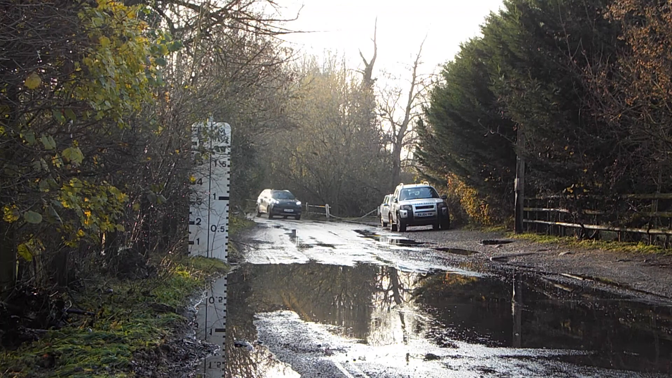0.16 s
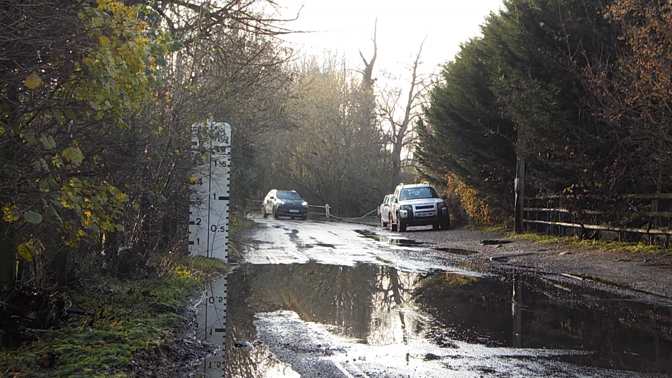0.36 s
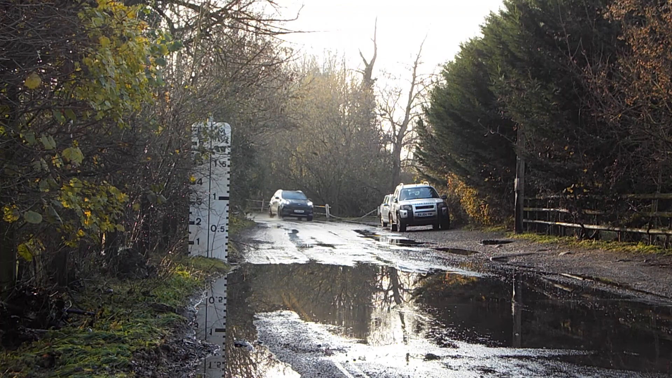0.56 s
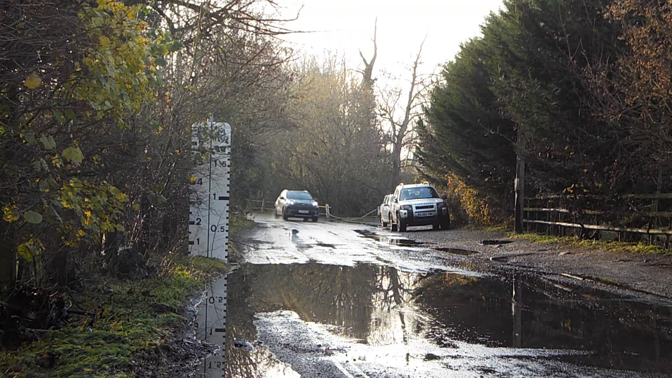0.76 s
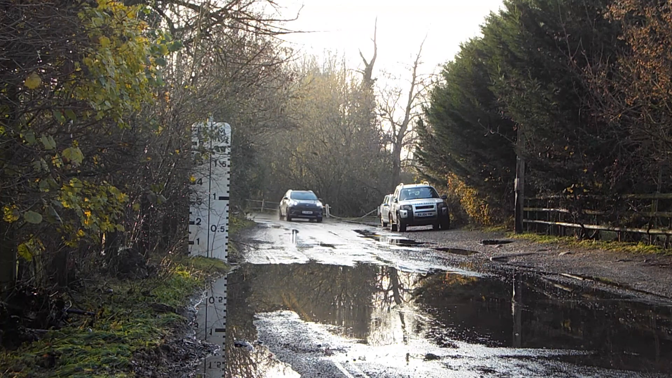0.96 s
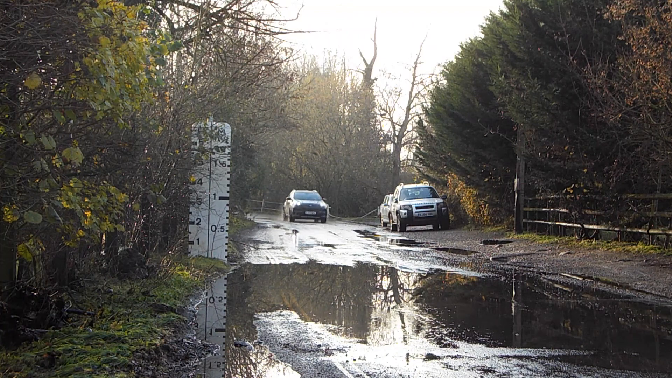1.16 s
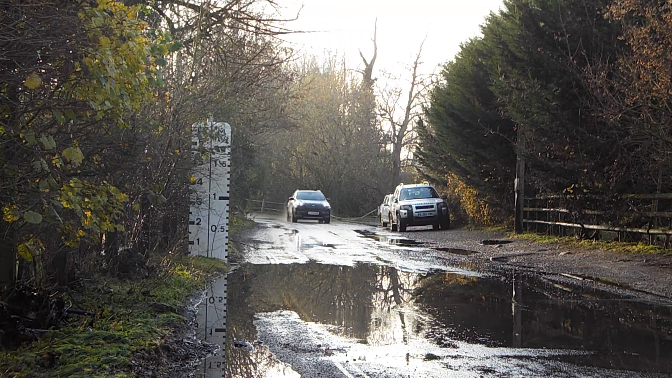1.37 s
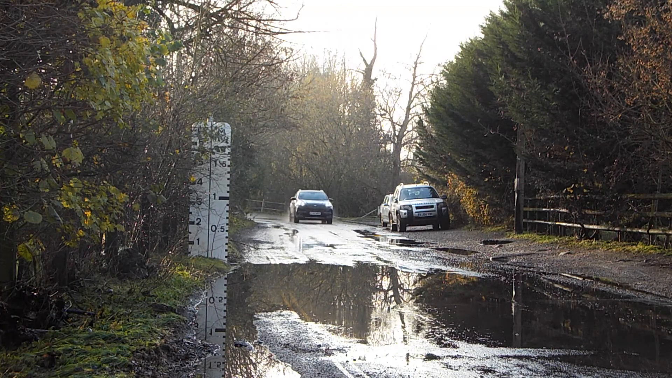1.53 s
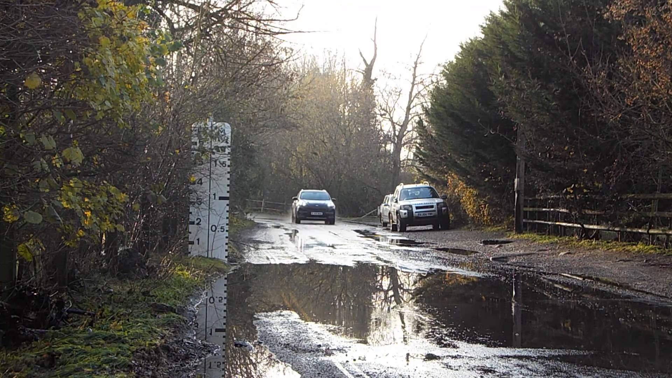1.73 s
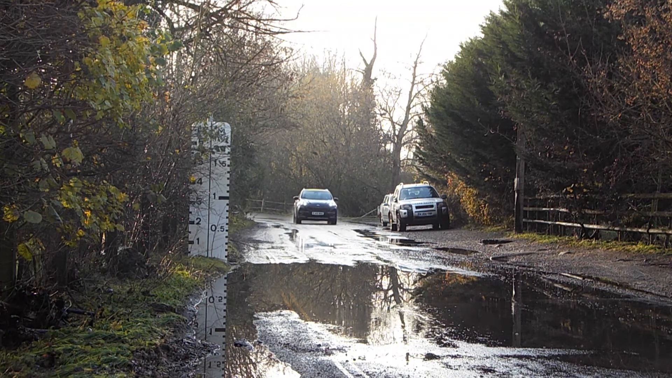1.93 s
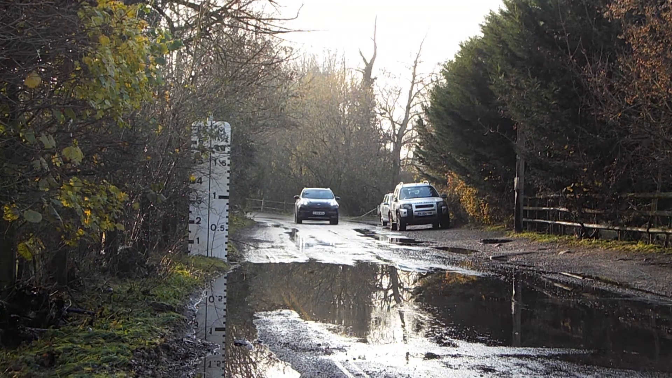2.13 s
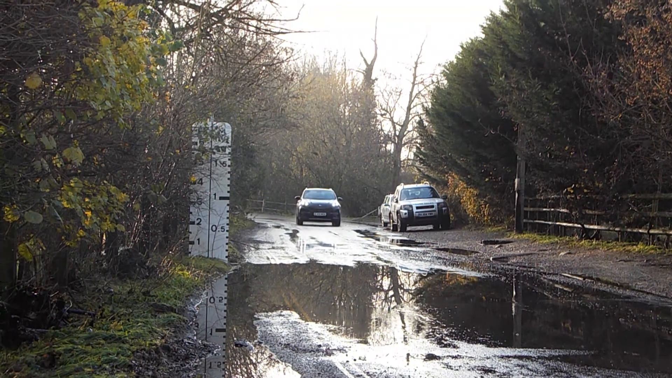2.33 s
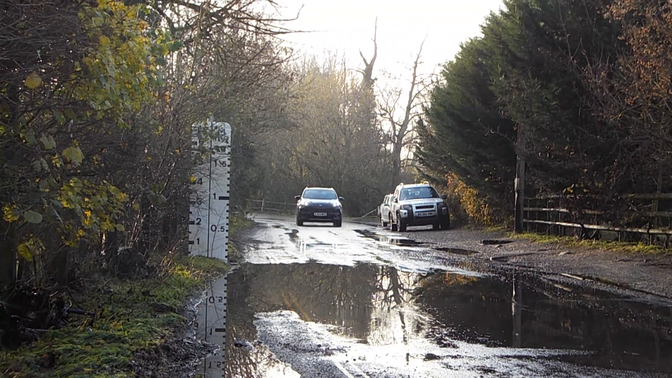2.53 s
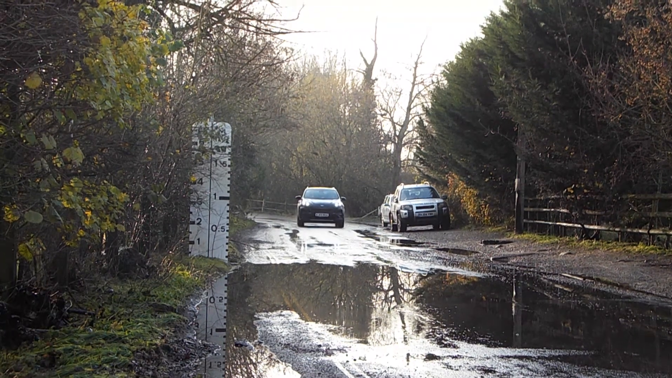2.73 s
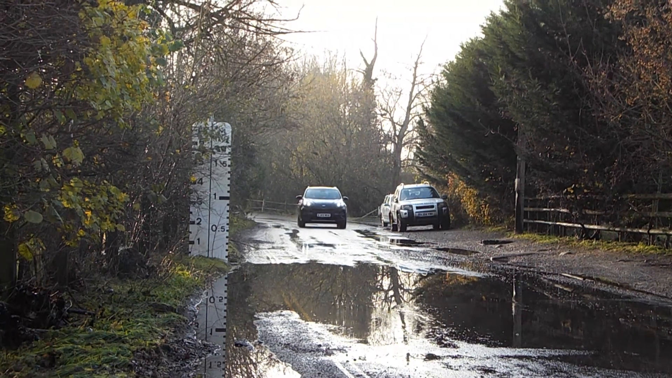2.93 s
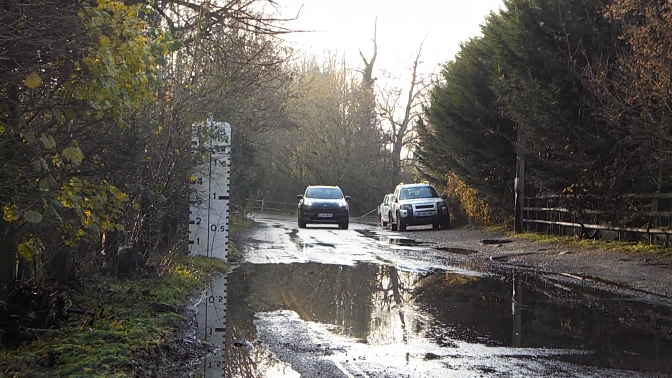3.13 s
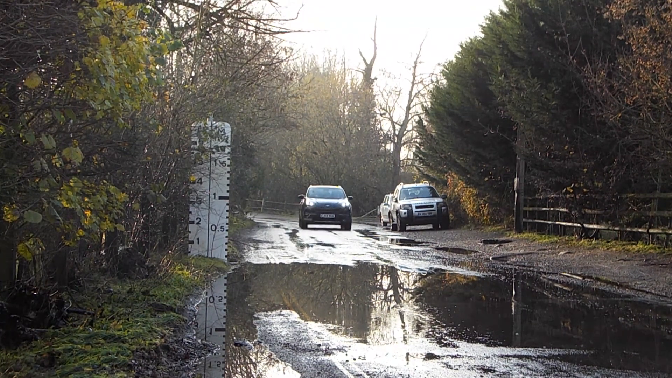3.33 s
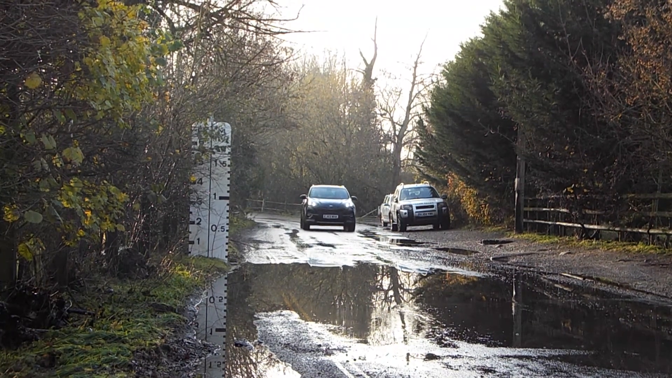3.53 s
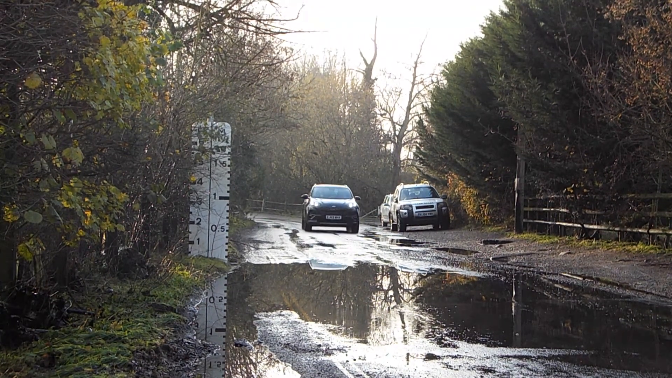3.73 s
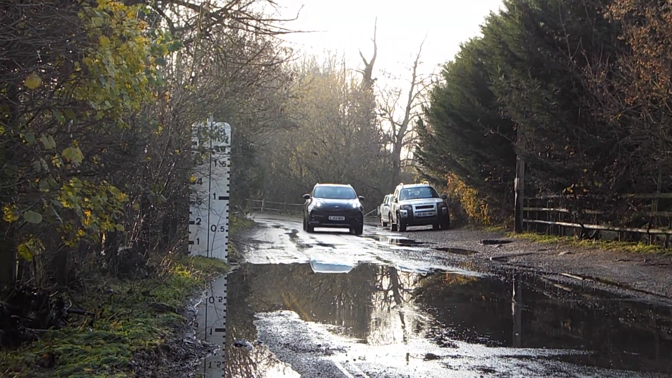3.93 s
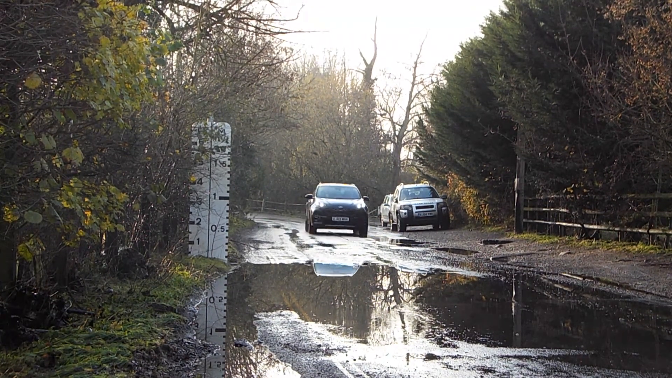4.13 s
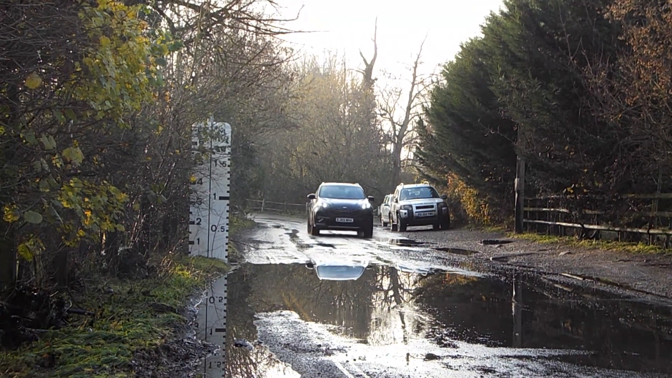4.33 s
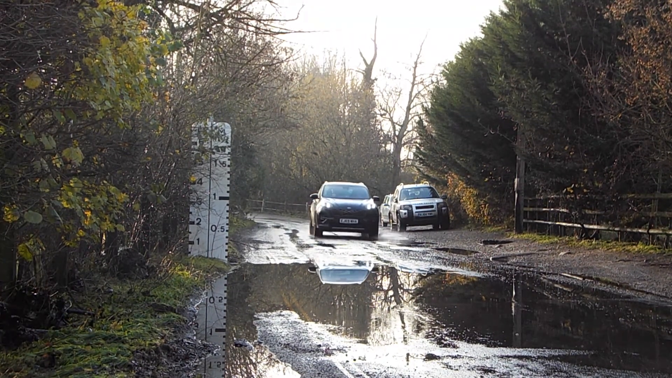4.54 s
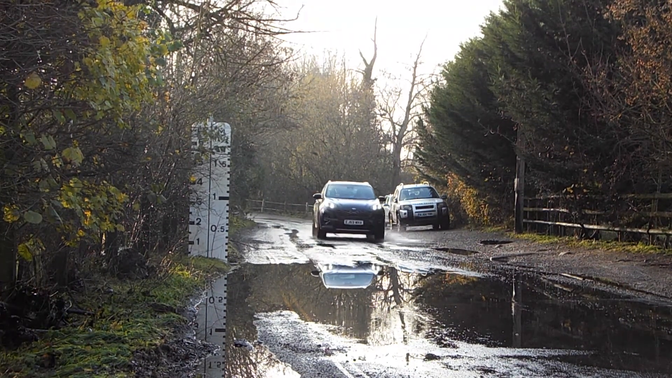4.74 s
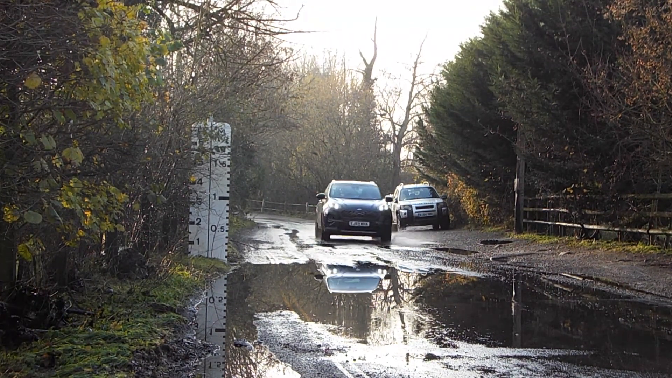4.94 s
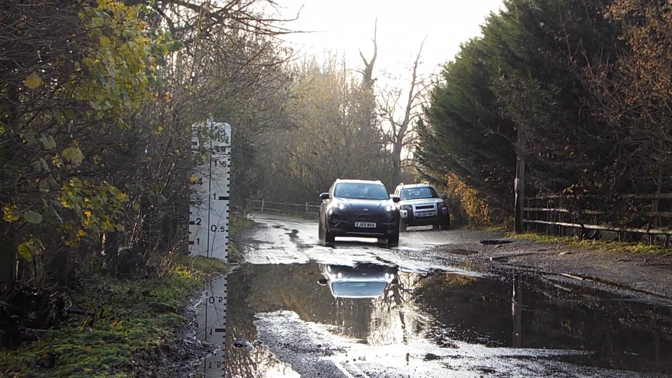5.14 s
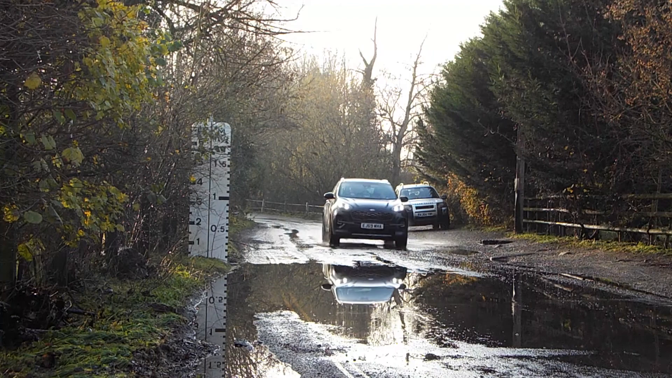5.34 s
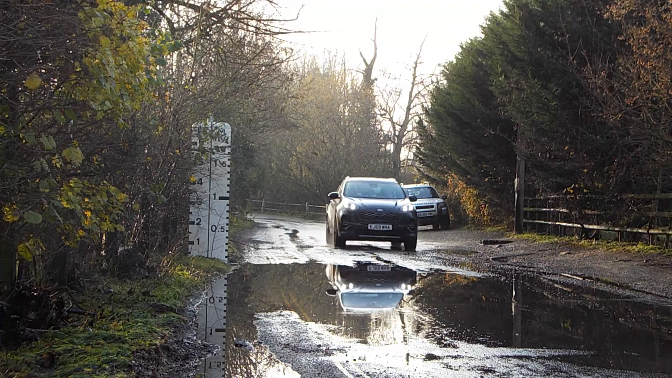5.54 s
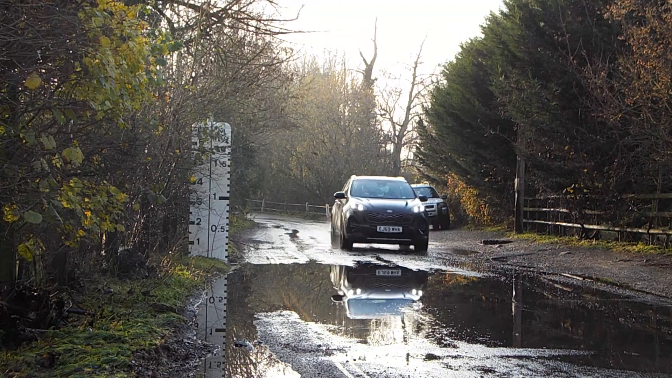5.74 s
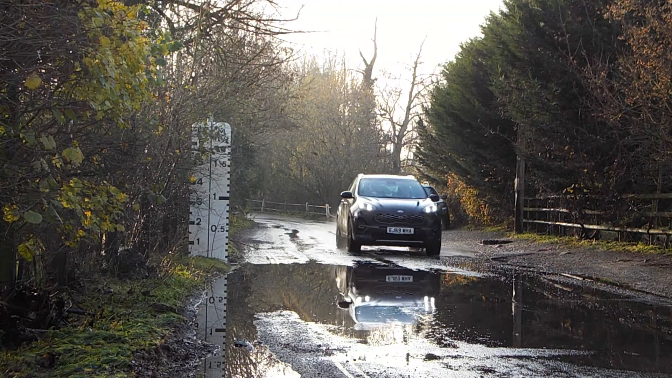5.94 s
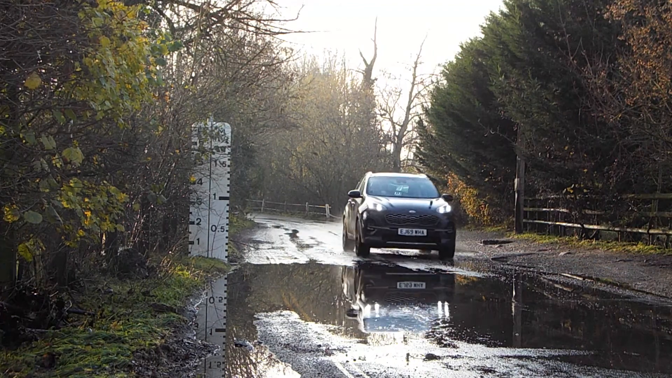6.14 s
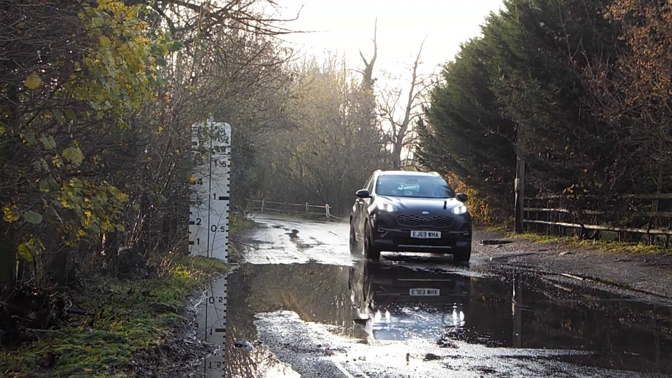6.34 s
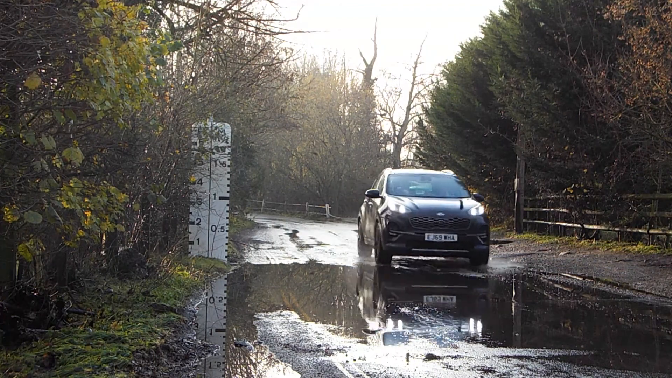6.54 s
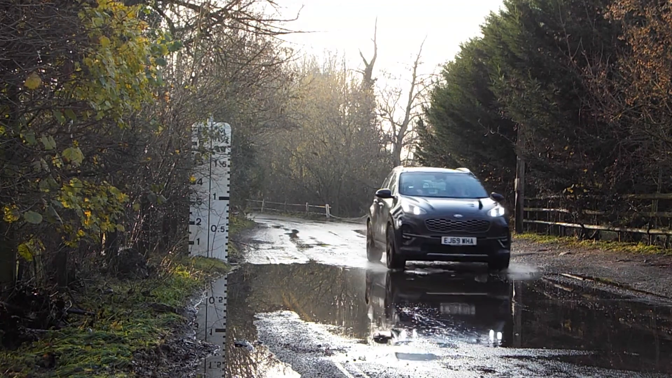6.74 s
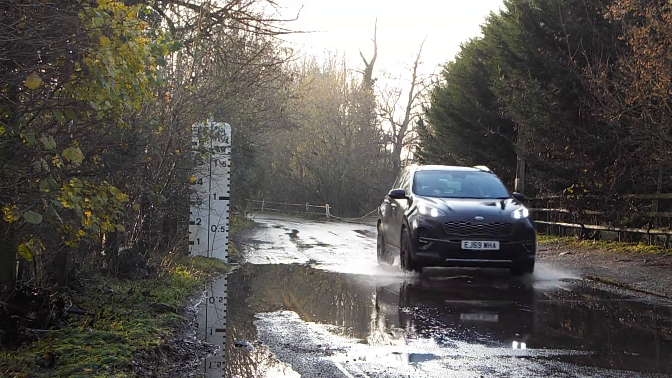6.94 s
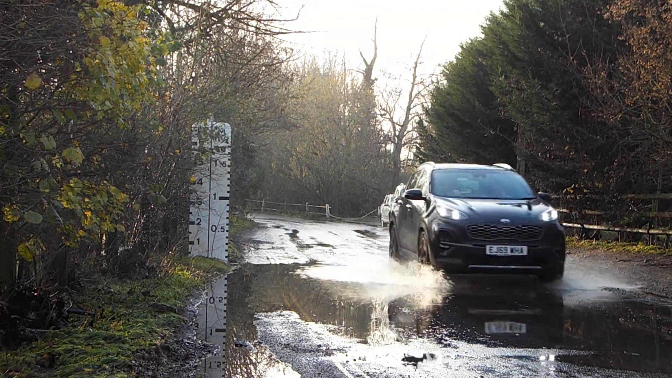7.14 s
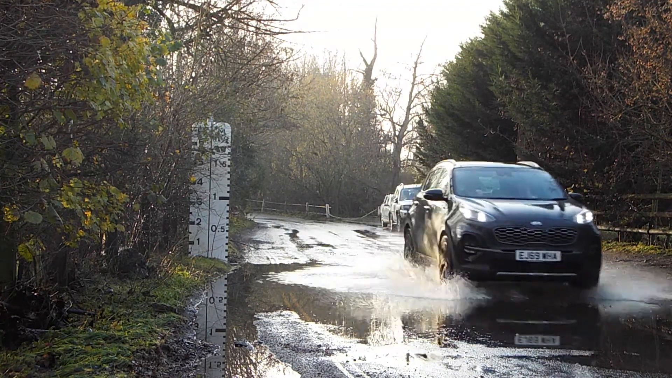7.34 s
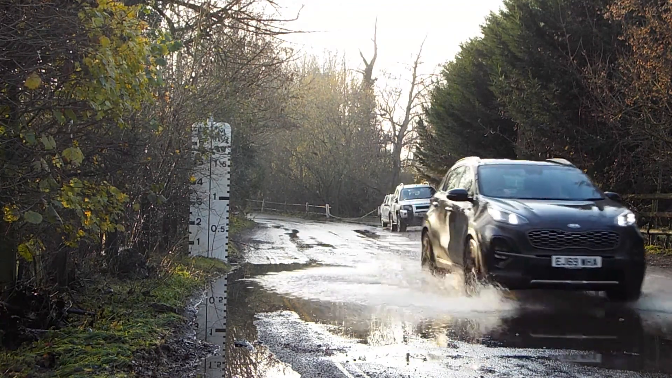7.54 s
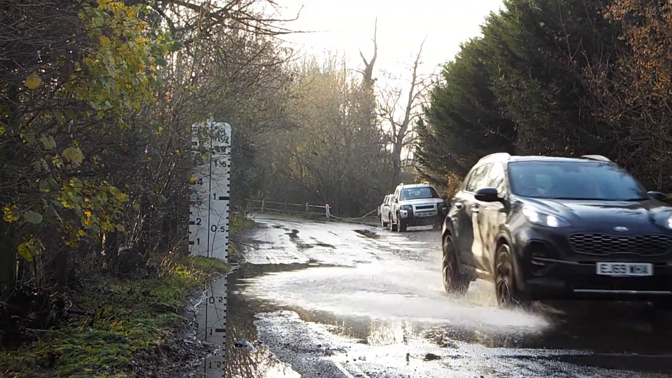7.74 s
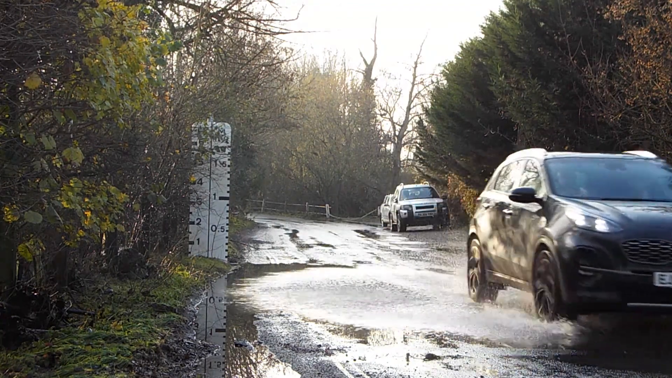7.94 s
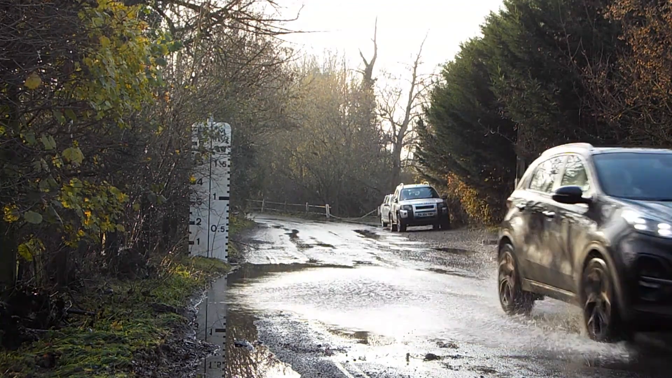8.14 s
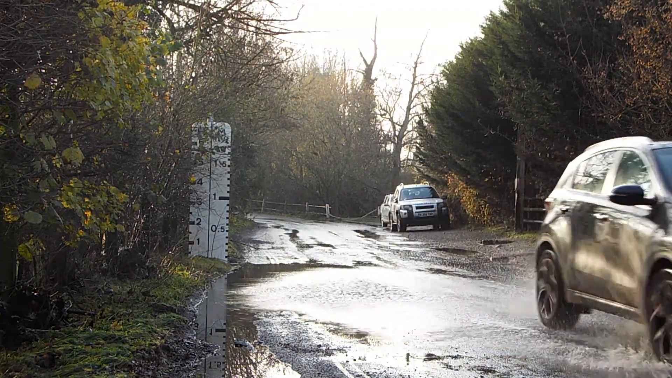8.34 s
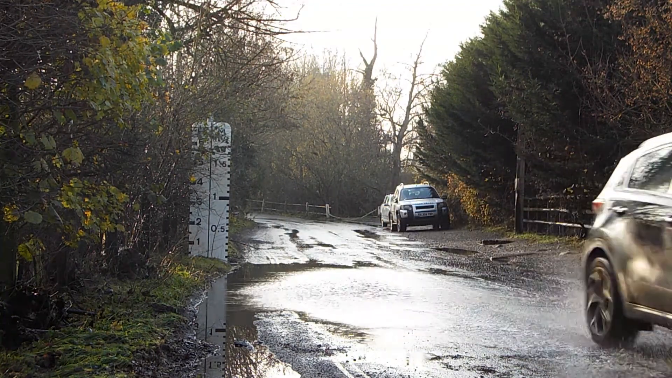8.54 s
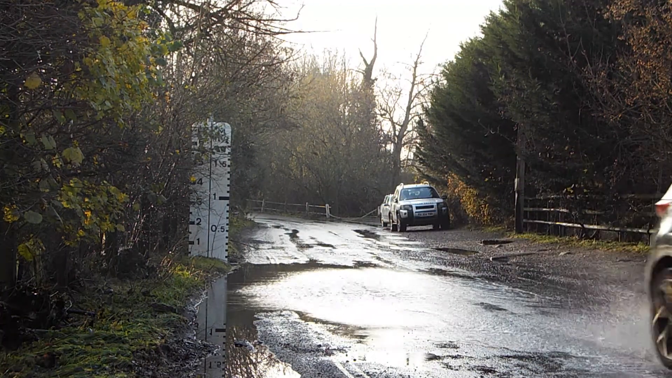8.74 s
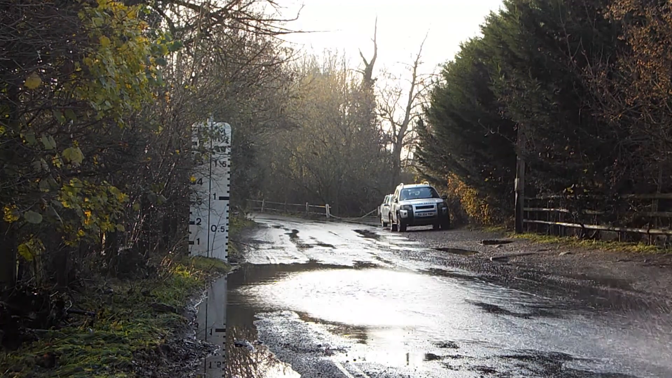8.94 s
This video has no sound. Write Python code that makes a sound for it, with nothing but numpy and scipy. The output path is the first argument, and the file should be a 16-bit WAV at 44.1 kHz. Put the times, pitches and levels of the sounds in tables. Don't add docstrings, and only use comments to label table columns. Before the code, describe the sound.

Wet tyre noise outdoors: first a thin, uneven sizzle some forty metres off, with quick puddle swishes, then a steady swell as the car comes toward a fixed bright stereo microphone. Larger bursts of spray and hollow bubbling pops arrive in the last few seconds, ending loud and close, still hissing. Faint tread whine, low tyre roll and engine hum stay underneath, over a quiet country background with distant traffic.

```python
import sys
import numpy as np
from scipy import signal
from scipy.fft import rfft, irfft, next_fast_len
from scipy.io import wavfile
from scipy.ndimage import map_coordinates

SR = 44100
rng = np.random.default_rng(int(sys.argv[2]) if len(sys.argv) > 2 else 0)


def makeup_ratio(level_db):
    decades = np.asarray(level_db, float) / 20
    return 10 ** decades


def unload_wav(signal):
    wavfile.write(
        sys.argv[1],
        SR,
        np.round(np.clip(np.atleast_2d(signal).T, -1, 1) * 32767).astype(np.int16),
    )


N = 396459

# f/Hz, level/dB per Hz
WET_HISS = [(180, -42.5), (300, -35), (439, -15), (795, -8.5), (907, -10.5), (1110, -5), (1350, -5.5),
            (1540, 0), (1880, 2.5), (2210, 2.5), (3290, -1), (5580, 5.5), (7760, -6.5), (11300, -14),
            (15500, -29.5)]
# t/s, distance/m
DISTANCE = [(0, 41.3), (1.1, 37), (2.1, 27), (3.3, 24.4), (4.6, 15.5), (5.55, 13.1), (6.1, 9), (7, 7.07),
            (8.4, 5.55), (9, 4.1)]


def rms_one(x):
    return x / np.sqrt(np.mean(x ** 2) + 1e-20)


def in_time(rows):
    s, *columns = np.transpose(rows)
    return [np.interp(np.arange(N) / SR, s, column) for column in columns]


def coloured(x, points, low_hz=1, high_hz=1e6):
    size = next_fast_len(N)
    hz = np.arange(size // 2 + 1) * SR / size + 1
    points_hz, points_db = np.transpose(points)
    db = np.interp(np.log(hz), np.log(points_hz), points_db)
    edges = 1 / (1 + (low_hz / hz) ** 12) - 1 / (1 + (high_hz / hz) ** 12)
    return irfft(rfft(x, size) * makeup_ratio(db) * edges, size)[..., :N]


def band(x, low_hz, high_hz=1e6):
    return coloured(x, [(1, 0), (2, 0)], low_hz, high_hz)


def coloured_noise(points):
    return rms_one(coloured(rng.standard_normal((2, N)), points))


def drift(rate_hz):
    r = np.exp(-40 * np.pi * rate_hz / SR)
    slow = signal.lfilter([1], [1, -2 * r, r * r], rng.standard_normal(N // 20 + 2002))
    slow = slow[2000:]
    return np.interp(np.arange(N) / 20, np.arange(len(slow)), rms_one(slow))


def narrow(hz, width_hz):
    turns = np.exp(2j * np.pi * np.cumsum(hz) / SR)
    return rms_one(np.real(turns * (drift(width_hz) + 1j * drift(width_hz))))


def nearness_db():
    return 20 * np.log10(10 / in_time(DISTANCE)[0])


def droplets(per_s, spread_db):
    born = rng.random((2, N)) < per_s * makeup_ratio(4.0 * drift(25)) / SR
    sizes = makeup_ratio(spread_db * np.minimum(rng.exponential(1, (2, N)), 4))
    signs = rng.choice([-1, 1], (2, N))
    return rms_one(born * sizes * signs)


def puddles_db():
    # deepest at t/s, extra wetness/dB, going in/s, coming out/s
    puddles = [(.505, 10.5, .02, 0.032), (.775, 5.5, 0.078, .12), (.885, 6, .1, 0.13),
               (1.165, 5.5, 0.047, 0.22), (1.27, 8.5, 0.066, 0.055), (1.42, 4, 0.26, 0.088),
               (1.86, 4.5, 0.098, 0.19), (2.11, 19, .014, 0.033), (2.14, 9.5, .04, 0.12),
               (2.305, 8, 0.03, 0.071), (2.595, 5.5, 0.24, 0.12), (2.795, 5, 0.024, 0.056),
               (2.89, 4, 0.096, 0.22), (3.245, 8.5, 0.078, 0.061), (3.365, 10.5, 0.014, 0.26),
               (3.66, 7.5, 0.06, 0.045), (3.825, 5.5, .08, 0.078), (4.015, 9.5, 0.042, .07),
               (4.155, 5.5, .065, 0.17), (4.285, 9, 0.032, 0.1), (4.72, 1, 0.072, 0.13),
               (5.055, 4, 0.14, 0.029), (5.325, 7, .04, 0.23), (5.48, 4, .1, 0.049), (5.63, 5.5, .05, 0.19),
               (6.05, 5, 0.021, 0.15), (6.155, 7, 0.15, 0.23), (6.705, 5, 0.29, 0.22),
               (8.28, 1.5, 0.49, 0.12), (8.665, 3, 0.18, 0.13)]
    t, depth = np.arange(N) / SR, np.zeros(N)
    for s, db, going_in, coming_out in puddles:
        corners = [s - max(going_in, 0.005), s, s + max(coming_out, 0.005)]
        depth = np.maximum(depth, np.interp(t, corners, [0, db, 0]))
    return depth


def tyres():
    crossovers_hz = [1400, 3600, 7500]
    # level at 10 m/dB, share of nearness, of wetness, of puddles, share of drops
    ranges = [
        (-38.5, 1.06, 0.031, 0.062, 0.5),
        (-36.5, 0.87, 0.77, 0.44, 0.34),
        (-37.5, 0.96, 1.03, 0.87, 0.34),
        (-49, 1.33, 0.57, 0.69, 0.087),
    ]
    fineness_shares = (-0.21, -0.0021, -0.2, 0.93)
    # t/s, wetness/dB, how finely it is thrown/dB
    wetness = [(0, -11.5, 2), (.42, -3.5, -2), (.445, 1, .1), (1.09, 5, .1), (1.6, 4, 2),
               (2.08, -1.5, -1.5), (2.76, -4, .1), (3.5, -1.5, 2), (3.95, -0.5, -0.5), (4.95, 1.5, -1),
               (5.56, 5, 0.8), (6.02, 3, -2.5), (6.41, 4, -1), (6.95, 4.5, -2), (7.5, 4, 2.5),
               (8.0, 6, -0.3), (8.55, 6, 1), (8.99, 8.5, -1)]

    edges = [1, *crossovers_hz, 1e6]
    drops, hiss = droplets(per_s=2500, spread_db=3.5), rng.standard_normal((2, N))
    flicker_db = 0.46 * drift(24) + 0.12 * drift(90)
    near_db, (wet_db, fine_db), deep_db = nearness_db(), in_time(wetness), puddles_db()
    water = 0
    for (db, near, wet, deep, share), fine, low, high in zip(ranges, fineness_shares, edges, edges[1:]):
        level_db = db + near * near_db + wet * wet_db + deep * deep_db + fine * fine_db
        own_flicker_db = 0.58 * drift(39)
        source = np.sqrt(share) * drops + np.sqrt(1 - share) * hiss
        texture = rms_one(coloured(source, WET_HISS, low, high))
        water = water + makeup_ratio(level_db + flicker_db + own_flicker_db) * texture
    whine = makeup_ratio(-50.5 + 0.63 * near_db) * narrow(np.full(N, 798.6), width_hz=55)
    return water + whine


def splashes():
    # t/s, peak level/dB, dies away in/s
    bursts = [(0.4375, -22.5, 0.05), (0.4950, -26, 0.034), (1.2594, -26, 0.035), (2.1046, -26, 0.046),
              (2.1594, -16.5, 0.026), (2.7801, -23, 0.055), (3.2455, -27, 0.05), (3.4151, -22, 0.05),
              (3.8127, -17, 0.05), (4.0038, -25, 0.05), (5.0495, -20, 0.057), (5.2979, -25, 0.05),
              (5.5994, -10, 0.05), (5.6494, -24, 0.05), (6.0332, -25, 0.04), (6.1494, -23, 0.05),
              (6.4494, -11, 0.05), (6.6544, -10, 0.037), (6.7044, -21, 0.05), (7.8526, -7, 0.045),
              (8.2644, -9, 0.063), (8.6647, -5.5, 0.042), (8.9704, -8, 0.066)]
    t, swell = np.arange(N) / SR, np.zeros(N)
    for s, db, dies in bursts:
        at = round(s * SR)
        age = np.maximum(t[at:][:SR // 4] - s, 0)
        level_db = db - 17.0 - 60 * age / max(4 * dies, 0.02)
        rise = 1 - np.exp(-age / 0.0014)
        swell[at:][:SR // 4] += makeup_ratio(level_db) * rise
    spray = droplets(per_s=9000, spread_db=4.5)
    return swell * rms_one(coloured(spray, WET_HISS, low_hz=1100))


def pops():
    # t/s, peak level/dB, f/Hz, ring/cycles, crack level/dB against the pop
    pockets = [(2.2258, -22, 1100, 0.8, -4), (2.3077, -13, 1190, 2.4, -3), (2.32, -21, 1500, 1.5, -22),
               (3.36, -25, 1300, 1.9, 2), (3.4165, -27, 1500, 1.5, 2), (6.031, -19, 1200, 4.3, -8),
               (7.2642, -15, 2200, 6.0, -20), (7.268, -17, 1600, 5.0, -20), (2.1056, -24, 1900, 3.0, -10),
               (7.232, -15, 2000, 4.0, -20), (7.163, -17, 2100, 3.4, -12), (7.2597, -9, 1500, 2.1, -20),
               (7.2635, -8.5, 1250, 4.1, -20), (7.5215, -11.5, 1400, 2, -17), (7.536, -15, 1300, 2.2, -12),
               (7.7140, -6, 1800, 1.4, -19), (7.7143, -29, 1100, 1.9, -25), (8.19, -13, 2500, 4.2, -12),
               (8.333, -12, 1120, 1.8, -14), (8.393, -14, 2170, 3.0, -12), (5.666, -22, 1510, 1.5, -1),
               (8.681, -19, 2120, 3.2, -12)]
    rings, cracks, t = np.zeros(N), np.zeros(N), np.arange(600) / SR
    for s, db, hz, cycles, crack_db in pockets:
        at, age = round(s * SR), t * hz * 3 / cycles
        swell = age ** 2 * np.exp(2 - 2 * age)
        rings[at:at + 600] -= makeup_ratio(db) * swell * np.sin(2 * np.pi * hz * t)
        cracks[at + 12] = -makeup_ratio(db + crack_db + 14)
    bright = signal.butter(3, [2200, 7200], "band", fs=SR, output="sos")
    no_lows = signal.butter(4, 560, "high", fs=SR, output="sos")
    return signal.sosfilt(no_lows, rings + signal.sosfilt(bright, cracks))


def rumble():
    # f/Hz, level/dB per Hz
    roll_colour = [(20, -60), (60, -27), (120, -13), (170, -9.5), (215, -5), (260, -5.5), (310, -8),
                   (420, -1), (550, -20), (900, -90)]
    near_db, slowing_s = nearness_db(), np.maximum(np.arange(N) / SR - 3.6, 0)
    steady = makeup_ratio(-73.5 + 1.7 * near_db) * narrow(np.full(N, 217), width_hz=9.5)
    sinking_hz = 281 - 10.5 * slowing_s + 1.5 * drift(3.0)
    sinking_db = -65 - 4.5 * abs(slowing_s - 2.2)
    sinking = makeup_ratio(sinking_db) * np.sin(2 * np.pi * np.cumsum(sinking_hz) / SR)
    roll = makeup_ratio(-58.5 + 0.83 * near_db + 0.5 * drift(3.9)) * coloured_noise(roll_colour)
    return steady + sinking + roll


def echoes(x):
    # t/s, lag/ms, share of the direct sound
    road = [(.9, .29, 0), (1.35, .2, .2), (1.6, .15, .28), (2.0, .14, .2), (3.3, .145, .17),
            (3.75, .165, .18), (4.1, .2, .12), (5.2, .22, 0)]
    # t/s, lag/ms, share of the direct sound
    flank = [(.85, 2.42, 0), (1.45, 2.01, .2), (2.1, 1.8, .32), (2.65, 1.72, .29), (3.15, 1.69, .34),
             (3.5, 1.7, .32), (3.78, 1.77, .25), (4.15, 1.82, .33), (4.85, 1.85, 0)]
    # t/s, lag/ms, share of the direct sound
    kerb = [(1.2, .27, 0), (1.6, .24, .17), (1.95, .205, .3), (2.3, .183, .3), (3.2, .18, .33),
            (3.7, .19, 0)]
    # t/s, lag/ms, share of the direct sound
    bumper = [(1.4, 1.85, 0), (2.1, 1.73, .28), (2.65, 1.66, .34), (3.15, 1.64, .38), (3.55, 1.64, .36),
              (3.75, 1.79, .26), (4.15, 1.82, .24), (4.5, 1.84, 0)]
    # lag/ms, share, from t/s, to t/s
    broad_parts = [
        (.48, -.17, 1.8, 3.55),
        (2.96, .08, 2.3, 3.6),
        (.34, .3, 8.6, 9),
    ]
    # lag/ms, share, from t/s, to t/s
    small_parts = [
        (1.3, .3, 3.1, 3.6),
        (2.76, -.18, 3.75, 6.9),
    ]

    t, out = np.arange(N) / SR, x.copy()
    lower, top = band(x, 1200, 6500), band(x, 6000)
    off_road = makeup_ratio(1.5) * band(x, 1, 11500)
    for path, returned in ((road, off_road), (flank, lower), (kerb, top), (bumper, top)):
        lag_ms, share = in_time(path)
        at = np.arange(N) - lag_ms * SR / 1000
        out += share * np.array([map_coordinates(row, [at], order=3) for row in returned])
    fade_s = 0.15
    for parts, returned in ((broad_parts, lower), (small_parts, top)):
        for lag_ms, share, start, end in parts:
            heard = np.interp(t, [start - fade_s, start, end, end + fade_s], [0, share, share, 0])
            out += heard * np.roll(returned, round(lag_ms * SR / 1000), axis=1)
    return out


def travel(x):
    metres, = in_time(DISTANCE)
    finest = band(x, 12200)
    gain_db = 0.65 * (9 - metres) + 1.5 * drift(5.0)
    return x + (makeup_ratio(gain_db) - 1) * finest


def hedge_scatter(scattered):
    # f/Hz, level/dB against the direct
    colour = [(60, -3), (110, -8), (200, -12), (380, -19), (700, -18), (1290, -27), (2380, -21),
              (4400, -14.5), (8120, -8.5), (15000, -4)]
    # t/s, level added to the scatter/dB
    spread = [(0, -5), (1.75, -1.5), (1.9, 2), (3.5, 2.5), (3.8, -1.5), (5, -2), (6.5, -2), (8, -1),
              (9, 2.5)]
    return makeup_ratio(in_time(spread)[0] - 2.5) * coloured(scattered, colour)


def distant_drone():
    # f/Hz, level/dB per Hz
    colour = [(15, -34), (30, -24), (60, -8.5), (120, -6), (200, 2), (300, -18), (600, -70)]
    return makeup_ratio(-74.5) * coloured_noise(colour)


def open_air():
    # f/Hz, level/dB per Hz
    colour = [(20, -34), (60, -17), (200, -12), (700, -1), (1500, -10), (4000, -11), (8000, -17),
              (12000, -13), (16000, -12)]
    return makeup_ratio(-63) * coloured_noise(colour)


def scene():
    water = tyres() + splashes() + pops() * [[1], [0.5]]
    water = travel(echoes(water))
    direct, scattered = makeup_ratio(-1.0) * water + rumble() + distant_drone()
    side = hedge_scatter(scattered)
    return np.array([direct + side, direct - side]) + open_air()


def band_limit(x):
    return signal.sosfilt(signal.butter(12, 15670, fs=SR, output="sos"), x)


def record(dry):
    # f/Hz, left over right/dB
    ports = [(60, -.7), (125, .2), (250, 1.2), (500, 1.1), (1000, .2), (2400, .1), (4400, -.4), (8000, 2.4),
             (12000, 3.6), (16000, 4)]
    left = coloured(dry[0], [(hz, db / 2) for hz, db in ports])
    right = coloured(dry[1], [(hz, -db / 2) for hz, db in ports])
    return band_limit(np.array([left, right]))


dry = scene()
out = record(dry)
unload_wav(out)
```